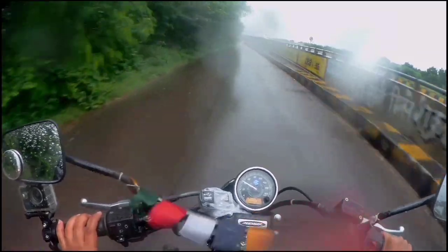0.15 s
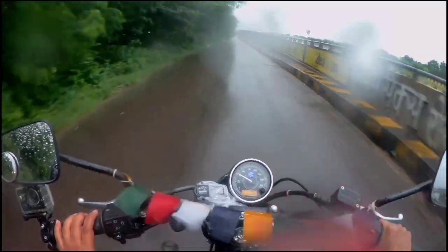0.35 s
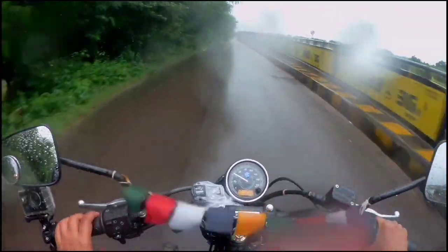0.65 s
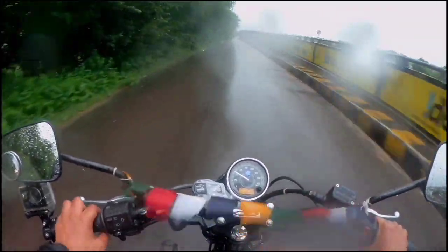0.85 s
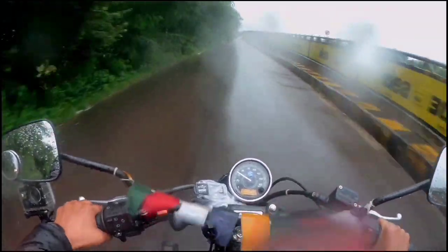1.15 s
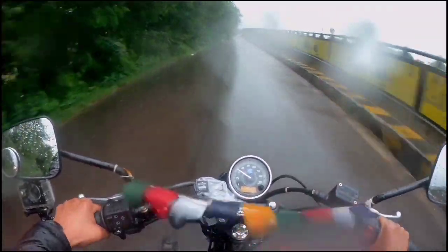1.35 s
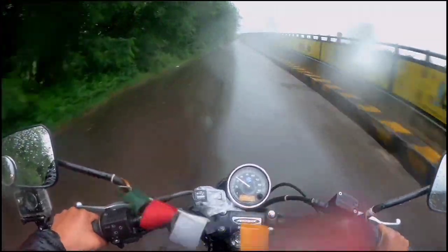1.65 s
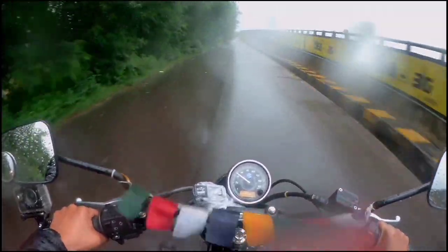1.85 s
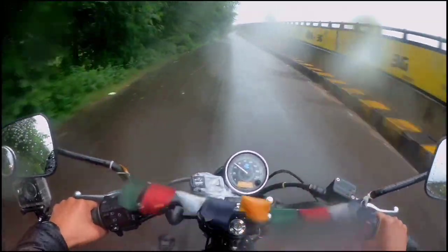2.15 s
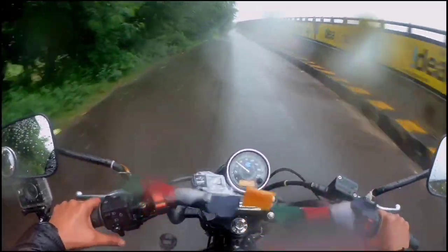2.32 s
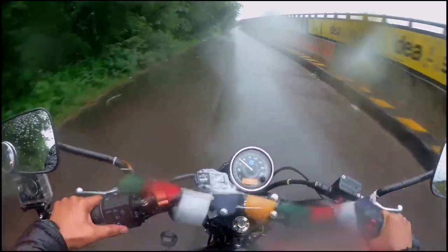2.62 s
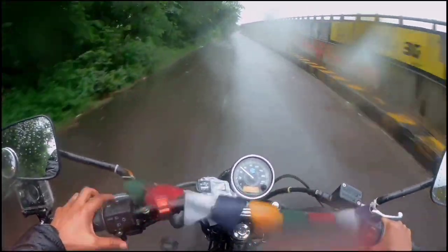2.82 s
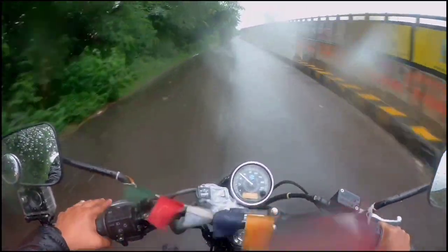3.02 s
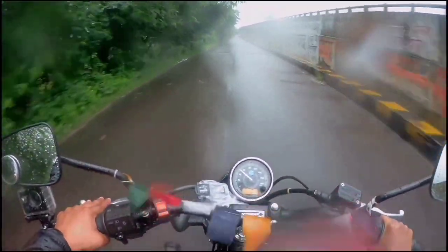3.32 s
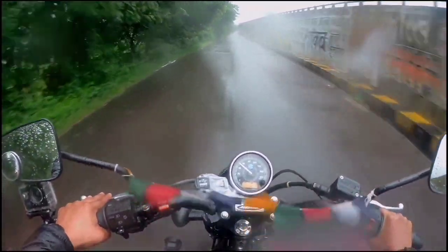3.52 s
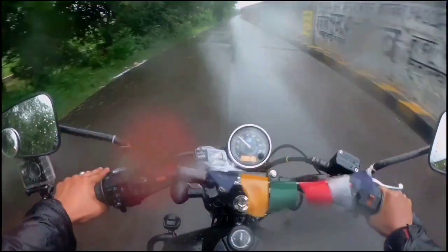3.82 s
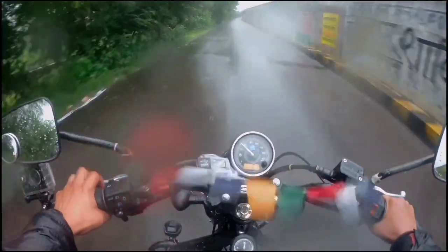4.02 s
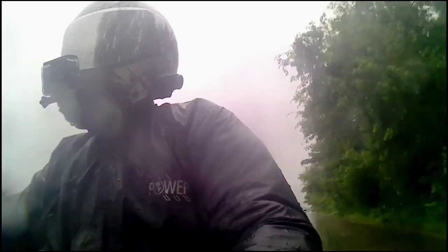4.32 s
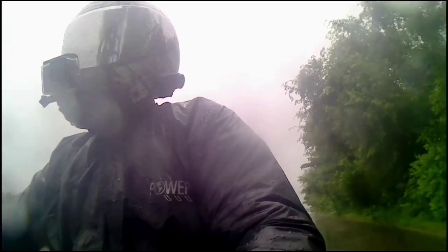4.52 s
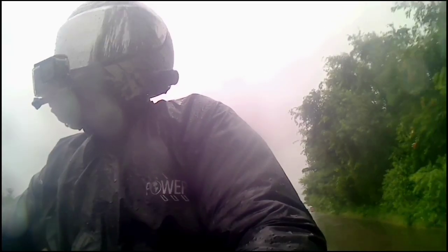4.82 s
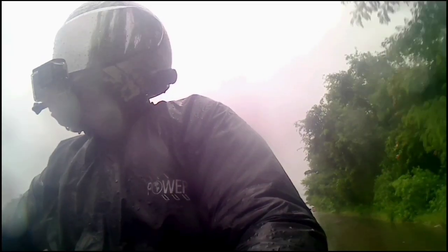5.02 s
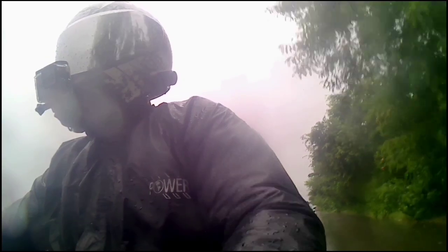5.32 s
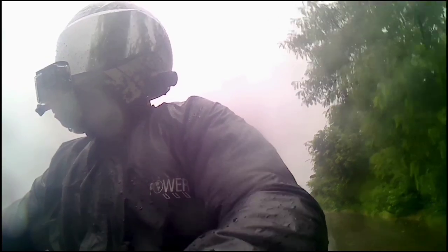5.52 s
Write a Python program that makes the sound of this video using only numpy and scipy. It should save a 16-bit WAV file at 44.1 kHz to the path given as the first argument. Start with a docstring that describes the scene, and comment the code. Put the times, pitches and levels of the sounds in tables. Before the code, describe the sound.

Raindrops tick and knock on the microphone's housing while wind buffets it and a motorcycle engine gradually gathers speed through spray.

```python
"""A single-cylinder motorcycle gathers speed on a wet road in heavy rain, heard from a sealed camera
on the rider. Each firing thumps down the exhaust pipe, and the valves knock and rattle in the engine.
The headwind rumbles over it, the tyres throw up spray and the rain hisses faintly.
Raindrops patter on the camera housing and make it ring; the whole scene sounds muffled."""
import sys
import numpy as np
from scipy import signal
from scipy.io import wavfile

SR = 44100
rng = np.random.default_rng(int(sys.argv[2]) if len(sys.argv) > 2 else 0)


def master_out(mix):
    """Clip the mix to full scale and print it as 16-bit PCM to the path in sys.argv[1]."""
    frames = np.transpose(np.atleast_2d(mix))
    ceiling = np.clip(frames, -1, 1)
    pcm = np.round(ceiling * 32767).astype(np.int16)
    wavfile.write(sys.argv[1], SR, pcm)


N = 249898

# How fast the engine runs. Each row: time in seconds, firings per second.
ENGINE_SPEED = [(0, 23.8), (.55, 23.11), (1, 23.91), (1.5, 24.88), (2, 26), (2.5, 26.84), (3, 27.41),
                (3.5, 28.11), (3.9, 28.75), (4.4, 28.8), (4.5, 28.1), (4.72, 28.05), (5.12, 27.55),
                (5.67, 28.1)]


def from_db(db):
    """Turn decibels into a number to multiply by."""
    return 10 ** (np.asarray(db) / 20)


def rms_one(x):
    """Scale a signal so that its average power is 1."""
    return x / np.sqrt(np.mean(x ** 2) + 1e-20)


def in_time(rows):
    """Join rows of (seconds, values...) with straight lines: one curve for each value column."""
    times, *columns = np.transpose(rows)
    return [np.interp(np.arange(N) / SR, times, column) for column in columns]


def drift(rate):
    """A smooth random wobble, about 1 in size; a higher rate makes it move faster."""
    step = 40  # samples between random points
    r = np.exp(-2 * np.pi * step * rate / SR)
    slow = signal.lfilter([1], [1, -2 * r, r * r], rng.standard_normal(N // step + 2002))[2000:]
    return np.interp(np.arange(N) / step, np.arange(len(slow)), rms_one(slow))


def resonate(x, hz, width_hz):
    """Ring at one pitch; the smaller the width, the longer the ring."""
    r = np.exp(-np.pi * width_hz / SR)
    feedback = [1, -2 * r * np.cos(2 * np.pi * hz / SR), r * r]
    return signal.lfilter(np.array([1, 0, -1]) * (1 - r * r) / 2, feedback, x + 1e-18)


def body(x, modes):
    """An object rings at several pitches (its modes) at once; every second one is flipped in sign."""
    return sum((-1) ** k * from_db(db) * resonate(x, hz, width)
               for k, (hz, width, db) in enumerate(modes))


def band(x, low_hz, high_hz, order=2):
    """Keep the sound between two frequencies."""
    sos = signal.butter(order, [low_hz, min(high_hz, .45 * SR)], "band", fs=SR, output="sos")
    return signal.sosfilt(sos, x + 1e-18)


def clicks(times, db):
    """One-sample clicks at the given times in seconds."""
    out = np.zeros(N)
    out[np.clip(np.round(np.asarray(times) * SR).astype(int), 0, N - 1)] = from_db(db)
    return out


def banded_noise(spectrum, patchy_db, flicker_rate):
    """Noise in 21 bands from low to high, each flickering on its own."""
    hz, db = np.transpose(spectrum)
    edges = np.geomspace(hz[0], hz[-1], 22)
    white, out = rng.standard_normal((2, N + SR // 4)), 0
    for k, (low, high) in enumerate(zip(edges, edges[1:])):
        level_db = np.interp(np.log(low * high) / 2, np.log(hz), db)
        gain = from_db(level_db + patchy_db * drift(flicker_rate))
        out = out + gain * band(white[k % 2], low, high)[-N:]
    return rms_one(out)


def struck(hits, modes, uneven_db):
    """Soft, wet blows ring part of the housing; uneven_db varies how hard each blow rings each mode."""
    tap = signal.unit_impulse(SR // 8)
    rings = [from_db(db) * band(resonate(tap, hz, width), hz * 0.67, hz * 1.46)
             for hz, width, db in modes]
    peak, out = np.abs(sum(rings)).max(), 0
    for ring in rings:
        share = from_db(uneven_db * rng.standard_normal(N).clip(-1.5, 1.5))
        out = out + signal.oaconvolve(hits * share, ring / peak)[:N]
    return out


def rain_hiss(level_db=-69.5, swell_db=.5):
    """The rain hisses steadily, with a slight slow swell."""
    # The tone of the hiss. Each row: frequency in Hz, relative level in dB.
    spectrum = [(2500, -7), (4000, -41), (5200, -1), (6000, 4), (6600, 10), (7300, 2), (8200, -1),
                (11000, 2), (13500, -3.5), (15500, -7)]
    gain = from_db(level_db + swell_db * drift(4.2))
    return gain * banded_noise(spectrum, patchy_db=1.5, flicker_rate=20)


def tyre_spray(boost_db=2):
    """The tyres throw up water with a flickering swish."""
    # The tone of the spray. Each row: frequency in Hz, relative level in dB.
    spectrum = [(300, -3), (500, 1), (780, 0.5), (980, -4), (1200, -3), (1450, -6.5), (1700, -13),
                (1950, -15), (2700, -22), (3500, -32.5), (4800, -40.5), (9000, -43)]
    # How loud the spray is. Each row: time in seconds, level in dB before the boost.
    levels = [(0.05, -47), (0.59, -45.5), (1.13, -45), (1.52, -43), (3.26, -44.5), (3.5, -43),
              (4.84, -46.5), (5.09, -43), (5.23, -43), (5.6, -45)]
    spray_db, = in_time(levels)
    return from_db(spray_db + boost_db) * banded_noise(spectrum, patchy_db=1.07, flicker_rate=41)


def patter(per_s, spread_db):
    """Small drops land at random; most are faint, a few are strong."""
    landed = rng.random(N) < per_s / SR
    strength = from_db(spread_db * np.minimum(rng.exponential(1, N), 3.5))
    return landed * strength * rng.choice([-1, 1], N)


def rain_on_housing(medium_count=14, medium_db=-54, medium_spread_db=7, far_side_loss_db=47):
    """Fine patter rings the whole housing; a larger drop rings the nearest part most."""
    # How the wall, lens cover and microphone opening ring.
    # Each row: pitch in Hz, width in Hz, relative level in dB.
    wall = [(1124, 122, 1), (1286, 44, 0.5), (1644, 430, -5.5)]
    cover = [(2118, 410, 10.5), (2660, 290, 8), (3094, 195, 6), (3900, 89, 1.5), (4550, 200, -4)]
    opening = [(6170, 430, -2), (6550, 420, 2), (7000, 500, -12)]
    # Heavy drops. Each row: time in seconds, strength in dB, place (0 wall, 0.5 cover, 1 opening).
    heavy_drops = [(.065, -40, 0.48), (.1165, -46, 1), (.1246, -37, 0.59), (.3461, -35.5, .55),
                   (0.3650, -35.5, 0.62), (.6356, -42, 0.85), (.7563, -38, 0.58), (.8655, -39, .4),
                   (.9465, -44, 1), (0.9710, -39, 0.84), (1.1317, -32, 0.36), (1.337, -38, 0.75),
                   (1.4495, -39, 0.47), (1.483, -36, 0.37), (1.5599, -41, 0.46), (1.7465, -39, .78),
                   (1.7995, -46, 1), (1.9085, -46, 1), (2.0062, -31, 0.2), (2.1020, -28.5, .15),
                   (2.1765, -39, .48), (2.2145, -44, 1), (2.2933, -38, .98), (2.5745, -41, 0.95),
                   (2.6569, -34, 0.33), (2.7275, -38, .48), (2.7795, -41, 0.58), (2.7914, -32, 0.57),
                   (2.9072, -35, .45), (2.9793, -28, 0.23), (3.0014, -43, 0.66), (3.2999, -36, 0.55),
                   (3.5505, -34, .45), (3.614, -35, 0.54), (3.6245, -40, 0.52), (3.788, -38, 0.6),
                   (3.9225, -45, 1), (4.101, -41, 0.95), (4.1275, -39, .73), (4.1795, -44, 1),
                   (4.2425, -48, 0.93), (4.3098, -35, 0.6), (4.3425, -26.5, 0.34), (4.373, -42, .8),
                   (4.4245, -39, .5), (4.4317, -41, 0.9), (4.5185, -45, 1), (4.5412, -38, 0.67),
                   (4.5812, -42, 0.54), (4.7215, -45, 1), (4.8006, -33, 0.71), (4.8795, -42, .85),
                   (5.23, -36, 0.5), (5.3018, -31, 0.74), (5.3111, -37, .62), (5.3328, -33, .45),
                   (5.4328, -44, 0.18), (5.4745, -41, .58), (5.5836, -36, 0.49), (5.595, -29.5, 0.48),
                   (5.603, -38, 0.72)]
    when, size, where = rng.random((medium_count, 3)).T
    medium_drops = np.column_stack([when * N / SR, medium_db + medium_spread_db * (2 * size - 1), where])
    times, drop_db, place = np.vstack([heavy_drops, medium_drops]).T
    fine, out = patter(per_s=490, spread_db=4.0), 0
    # Each row: modes, place, patter level in dB, gain for larger drops in dB.
    parts = [(wall, 0, -53, -0.5), (cover, 0.5, -63.5, -6.5), (opening, 1, -76, -5.5)]
    for modes, part_place, fine_db, part_db in parts:
        hit_db = drop_db + part_db - far_side_loss_db * (place - part_place) ** 2
        out = out + from_db(fine_db) * rms_one(struck(fine * rng.random(N), modes, uneven_db=4.0))
        out = out + struck(clicks(times, hit_db), modes, uneven_db=3.0)
    return out


def splashes():
    """Fat drops knock short notes out of the housing or its mount; droplets make bright ticks."""
    # One or more notes to a drop. Each row: start in seconds, level in dB, pitch in Hz, width in Hz.
    notes = [(.5895, -43, 2024, 350), (.5895, -30, 1300, 400), (.635, -48, 2750, 80),
             (0.756, -59, 3080, 200), (.9705, -53, 6250, 260), (1.1317, -49, 4200, 350),
             (1.3362, -31.5, 1150, 150), (1.3368, -35, 1990, 150), (1.3368, -44, 2160, 130),
             (1.3364, -40.5, 3440, 100), (1.3368, -46, 4630, 130), (1.5055, -37, 3240, 420),
             (1.5057, -50, 2400, 200), (1.7832, -41.5, 3120, 280), (1.8405, -50, 3750, 350),
             (2.101, -43, 2450, 160), (2.101, -45, 3060, 150), (2.1015, -47, 3930, 190),
             (2.3665, -48.5, 3186, 200), (2.6415, -45, 2024, 220), (2.7795, -46, 2050, 200),
             (2.7804, -50, 2810, 180), (2.7795, -46, 3830, 170), (2.9789, -36.5, 3150, 560),
             (2.9793, -32.5, 1350, 350), (3.0014, -44, 3340, 160), (3.0014, -51, 6100, 300),
             (3.2820, -19.5, 1040, 360), (3.9745, -35, 1260, 220), (4.3098, -30.5, 1510, 99.3),
             (4.3104, -38, 2880, 450), (4.3098, -43, 4300, 420), (4.3098, -48, 6850, 350),
             (4.3388, -21, 275, 20), (4.3400, -28, 606, 190), (4.3420, -38, 1800, 600),
             (4.3422, -42, 3300, 1000), (4.3465, -31, 1300, 270), (4.3715, -43, 2770, 140),
             (4.3865, -34, 1000, 130), (4.3865, -38, 1722, 200), (4.501, -55, 3660, 110),
             (4.5405, -39, 1950, 220), (4.5685, -51, 4134, 350), (4.5685, -51, 3488, 250),
             (4.5805, -46, 2196, 250), (4.5805, -36, 1679, 220), (4.5812, -56, 4150, 300),
             (4.7785, -40, 2150, 220), (4.8006, -34, 1580, 85), (4.8003, -46, 2680, 170),
             (4.8004, -52, 3950, 150), (5.0945, -27, 890, 240), (5.0945, -34, 1464, 300),
             (5.1035, -42, 1550, 300), (5.23, -49, 4250, 250), (5.4325, -25.5, 1230, 280),
             (5.4329, -41, 2000, 250), (5.4329, -39.5, 3350, 520), (5.4327, -47, 4400, 450)]
    # Droplets right in the microphone opening. Each row: time in seconds, strength in dB.
    droplets = [(3.0023, -52), (4.3098, -51), (4.3425, -28.5), (4.3933, -35.5), (4.4316, -53)]
    knocks = sum(struck(clicks([start], [db]), [(hz, width, 0)], uneven_db=0)
                 for start, db, hz, width in notes)
    ticks = band(clicks(*np.transpose(droplets)), 1487, 10000, order=1)
    return knocks + 2.3 * ticks


def wind_rise(cruise_firings_per_s=27.25, db_per_doubling=13):
    """How many dB the wind is above its cruising level: it follows the speed, and gusts add to it."""
    # Gusts swell and fade. Each row: peak time in seconds, length in seconds, rise in dB.
    gusts = [(0.118, 0.11, 1), (1.933, 0.076, 4.5), (2.65, 0.42, 1.5), (2.91, 0.36, 1.5), (3.31, 0.18, 2.5),
             (3.503, 0.31, 3), (3.9, 0.43, 1), (4.38, 0.081, 3), (5.498, 0.22, 3.5)]
    firing_hz, = in_time(ENGINE_SPEED)
    t = np.arange(N) / SR
    gusts_db = sum(db * np.cos(np.pi * np.clip((t - peak) / length, -.5, .5)) ** 2
                   for peak, length, db in gusts)
    return db_per_doubling * np.log2(firing_hz / cruise_firings_per_s) + gusts_db


def headwind(cruise_db=-32.5, buffet_db=1.07):
    """Swirls of air buffet the microphone; in a gust, a rush and a hollow boom outgrow the rumble."""
    # The tone of the rumble. Each row: frequency in Hz, relative level in dB.
    spectrum = [(15, -5), (28, -2.5), (60, -1.5), (105, -1.5), (150, -2), (215, -1.5), (300, -3),
                (400, -11.5), (520, -14), (650, -20), (1000, -19), (2000, -48), (5000, -66)]
    rise_db = wind_rise()
    buffeting = from_db(buffet_db * drift(13.3))
    rumble = rms_one(buffeting * banded_noise(spectrum, patchy_db=0.5, flicker_rate=8.0))
    rush = rms_one(band(rng.standard_normal(N), 291, 572))
    boom = rms_one(band(rng.standard_normal(N), 133, 159))
    rush_gain = from_db(-11.5 + 0.32 * rise_db)
    boom_gain = from_db(-10.5 + 1.3 * np.minimum(rise_db, 1.5))
    return from_db(cruise_db + rise_db) * (rumble + rush_gain * rush + boom_gain * boom)


def engine_drone(waver_db=3.0):
    """Clean overtones follow the engine speed and sing out briefly at the listed times."""
    # The swells. Each row: peak time in seconds, length in seconds, level in dB.
    swells = [(1.83, 1.33, -39.5), (3.37, 0.73, -37), (2.05, 1.0, -46.5), (4.82, 0.39, -41.5),
              (3.67, 1, -48.5), (1.5, 0.32, -54), (2.18, .5, -50), (2.16, .6, -46.5), (3.47, 0.88, -50),
              (1.23, .5, -50.5), (.8, 0.5, -54)]
    # The pitch of each swell, as a multiple of the firing rate.
    multiples = [10, 10, 20, 20, 18, 26, 26, 28, 26, 34, 36]
    firing_hz, = in_time(ENGINE_SPEED)
    t = np.arange(N) / SR
    cycle, out = np.cumsum(firing_hz) / SR, 0
    for (peak, length, db), multiple in zip(swells, multiples):
        swell = np.cos(np.pi * np.clip((t - peak) / length, -.5, .5))
        gain = from_db(db + waver_db * drift(11.0))
        out = out + gain * swell * np.sin(2 * np.pi * (multiple * cycle + rng.random()))
    return out


def roadside_echoes(x, wander=0.028):
    """The exhaust points backwards and bounces off the road and a wall, whose distance keeps changing."""
    # The echoes. Each row: average delay in seconds, level in dB relative to the direct sound.
    echoes = [(.0088, -7.5), (0.0158, -13.5), (0.0264, -12)]
    n, out = np.arange(N), x
    for delay, db in echoes:
        lag = delay * SR * (1 + wander * drift(0.44))
        out = out + from_db(db) * np.interp(n - lag, n, x, left=0)
    return out


def valves(cycle, knock_phase=.2, fade_cycles=0.18, rattle_share=0.62):
    """The valves knock and rattle once a cycle; returns the ringing of the casing and of the head."""
    # How the engine casing and cylinder head ring.
    # Each row: pitch in Hz, width in Hz, relative level in dB.
    casing_modes = [(839, 21, 2), (1144, 15, 0.5), (1230, 26, -4.5), (1362, 19, -15), (1553, 30, -11),
                    (1681, 22, -4)]
    head_modes = [(696, 23, 4), (751.6, 27, 3.5)]
    since_knock = (cycle - knock_phase) % 1
    knock = 1.0 * (np.diff(since_knock, prepend=0) < 0)
    rattle = np.exp(-since_knock / fade_cycles) * rng.standard_normal(N)
    clatter = rms_one(knock) + rattle_share * rms_one(rattle)
    casing = band(body(clatter, casing_modes), 660, 1780)
    head = band(body(clatter, head_modes), 650, 770)
    return rms_one(casing), rms_one(head)


def exhaust(cycle, uneven_db=0.5, puff_share=0.44, fade_cycles=0.34):
    """Each firing sends a sharp pulse and a fading puff of gas down the pipe."""
    # How the pipe and silencer ring. Each row: pitch in Hz, width in Hz, relative level in dB.
    pipe_modes = [(92, 21.3, 4.5), (107, 23, 0), (159, 47, -8.5), (222, 36, -2), (261, 26.6, 1.5),
                  (286.2, 13.6, 2), (315.5, 36, -2.5), (356, 34, -4.5), (440, 47, -7.5), (495, 42, -7.5),
                  (683, 56, -14.5)]
    pulses = np.diff(np.floor(cycle), prepend=-1) * from_db(uneven_db * drift(4.3))
    puffs = np.exp(-(cycle % 1) / fade_cycles) * rng.standard_normal(N)
    pipe = body(rms_one(pulses) + puff_share * rms_one(puffs), pipe_modes)
    return rms_one(band(roadside_echoes(pipe), 75, 1000))


def engine():
    """One cylinder drives the exhaust and the valves in step; their loudness changes with the load."""
    # Engine load. Each row: time in seconds, then exhaust, casing and cylinder head levels in dB.
    load = [(0, -45, -53, -50), (.7, -40, -49.5, -57), (1.4, -38, -48.5, -46), (2, -36.5, -50, -48),
            (2.6, -41, -51.5, -49.5), (3.3, -45.5, -49.5, -52), (4.3, -35.5, -52, -57),
            (4.7, -40.5, -63, -64), (5.67, -40.5, -54, -52)]
    exhaust_db, casing_db, head_db = in_time(load)
    firing_hz, = in_time(ENGINE_SPEED)
    cycle = np.cumsum(firing_hz) / SR - .1  # goes up by 1 from one firing to the next
    thumps = exhaust(cycle)
    casing, head = valves(cycle)
    return from_db(exhaust_db) * thumps + from_db(casing_db) * casing + from_db(head_db) * head


def scene():
    """Rain, spray, wind and engine meet at one microphone."""
    weather = rain_hiss() + tyre_spray() + rain_on_housing() + splashes() + headwind()
    return (weather + engine_drone() + engine())[None]


def record(dry):
    """The highest treble is cut off steeply."""
    cutoff_hz = 15450
    return signal.sosfilt(signal.ellip(12, .1, 80, cutoff_hz, fs=SR, output="sos"), dry)


dry = scene()
out = record(dry)
master_out(out)
```